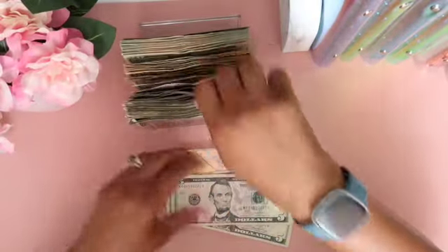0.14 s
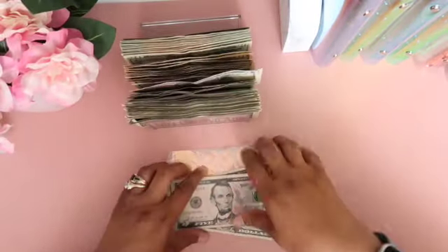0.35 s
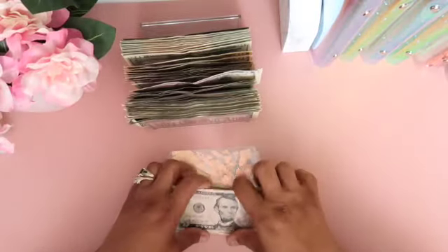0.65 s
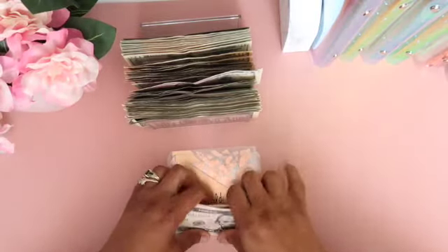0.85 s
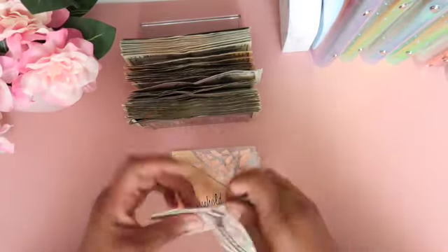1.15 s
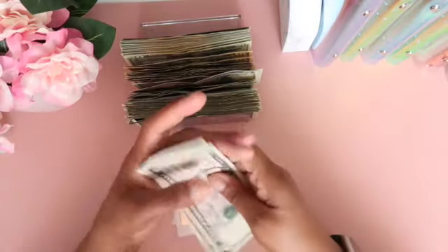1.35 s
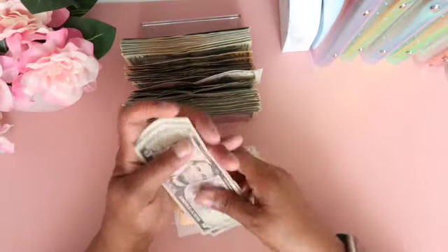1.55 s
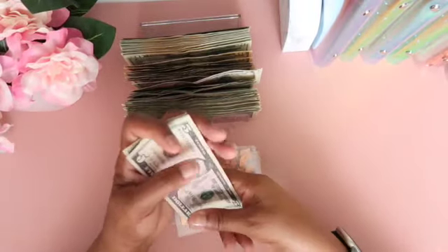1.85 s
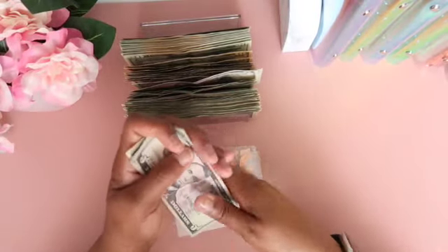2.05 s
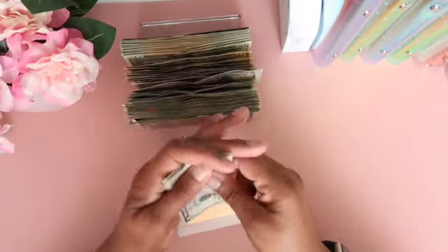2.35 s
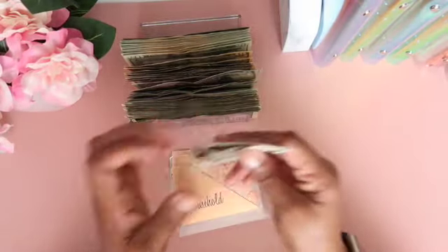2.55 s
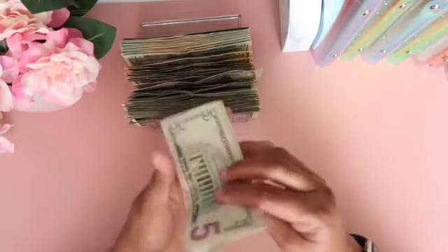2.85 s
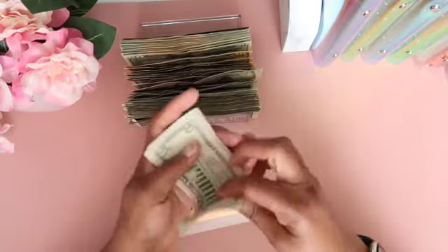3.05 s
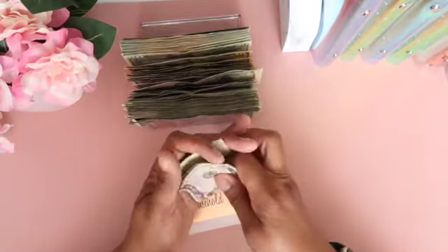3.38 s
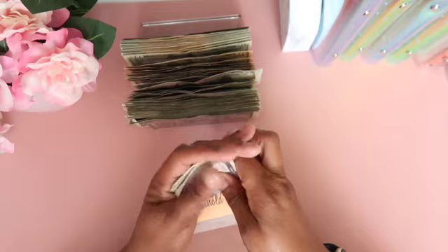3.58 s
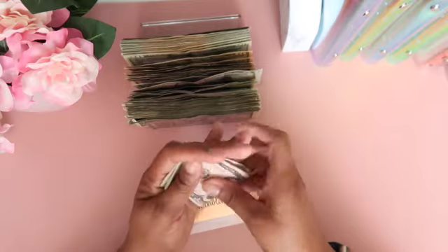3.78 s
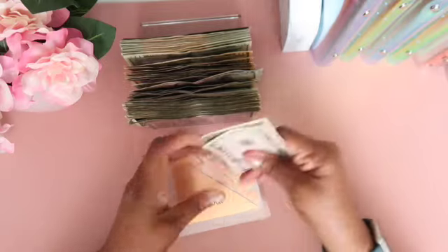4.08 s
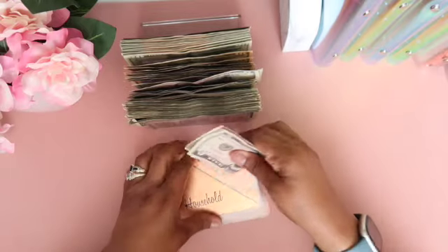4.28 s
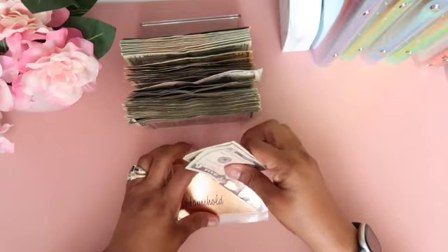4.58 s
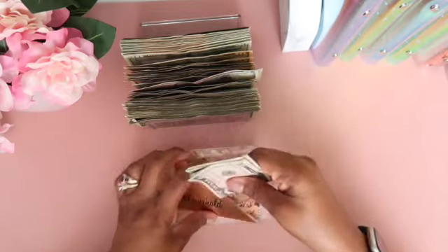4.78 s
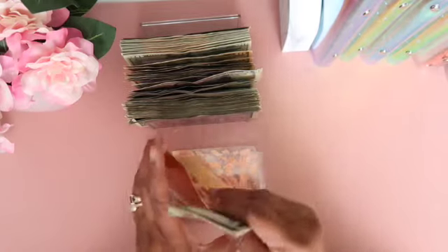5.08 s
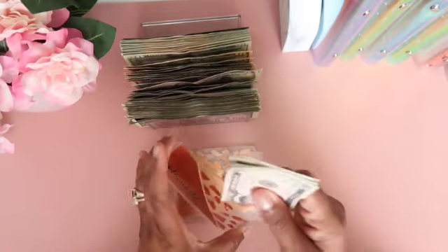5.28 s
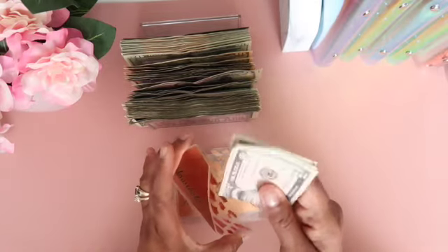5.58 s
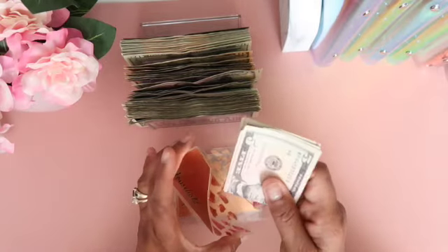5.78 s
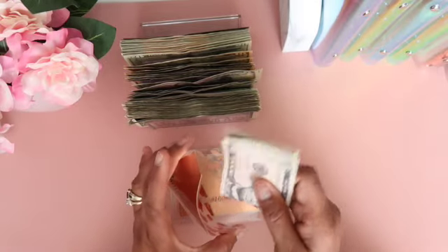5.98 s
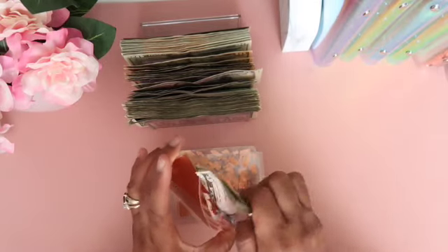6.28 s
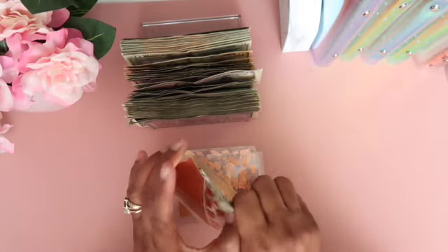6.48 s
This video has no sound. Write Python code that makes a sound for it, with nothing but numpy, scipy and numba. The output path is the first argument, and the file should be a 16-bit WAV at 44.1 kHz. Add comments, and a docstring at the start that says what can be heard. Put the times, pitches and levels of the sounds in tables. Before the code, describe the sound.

Paper bills rustle and snap in irregular bursts as hands count and tuck them into an envelope, with soft air thuds on the microphone.

```python
"""Hands count, fold and tuck banknotes into a stiff envelope on a desk, under a phone looking down.
A quiet room hums throughout. From the first moment, stirred air thuds on the two microphone ports,
paper slides with a grainy hiss as its fibres catch and slip, and creases snap, echoing off the desk.
The heaviest thuds come near 0.9 s and 2 s, a cluster of snaps near 2.9 s, then lighter handling.
From 5.9 s the stiff paper rings and cracks in its loudest flurry."""
import sys
import numpy as np
from scipy import signal
from scipy.io import wavfile
from scipy.ndimage import uniform_filter1d
from numba import njit

SR = 44100
rng = np.random.default_rng(int(sys.argv[2]) if len(sys.argv) > 2 else 0)


def transcribe(signal):
    """Save signal, clipped to [-1, 1], as a 16-bit WAV file at the path in sys.argv[1]."""
    frames = np.atleast_2d(signal).T
    limited = np.clip(frames, -1, 1)
    pcm = np.round(limited * 32767).astype(np.int16)
    wavfile.write(sys.argv[1], SR, pcm)


N = 292383
T = np.arange(N) / SR
LEFT_MINUS_RIGHT = np.array([[1], [-1]])


def undb(db):
    """Decibels to gain."""
    return 10 ** (np.asarray(db) / 20)


def level(x, db):
    """Scale to an rms level."""
    return x * undb(db) / np.sqrt(np.mean(x ** 2))


@njit
def svf(x, hz, width):
    """State-variable band-pass with a moving centre, gain 1 there."""
    y, band, low = np.empty(len(x)), 0., 0.
    for i in range(len(x)):
        g, damping = np.tan(np.pi * hz[i] / SR), width / hz[i]
        v = (band + g * (x[i] - low)) / (1 + g * (g + damping))
        band, low, y[i] = 2 * v - band, low + 2 * g * v, damping * v
    return y


def steep(x, hz, width):
    """The band-pass twice, for dark skirts."""
    hz = np.clip(hz + np.zeros(len(x)), 20, .45 * SR)
    return svf(svf(x, hz, 1. * width), hz, 1. * width)


def walk(rate):
    """Random levels held 1 / rate s and slewed twice; spread near 1."""
    hold = int(SR / rate)
    steps = np.repeat(rng.standard_normal(N // hold + 1), hold)
    return 1.3 * uniform_filter1d(uniform_filter1d(steps, hold), hold)[:N]


def grit(per_s, spread_db, smooth_db):
    """Sparse impulses of differing size over a smooth hiss."""
    size_db = spread_db * np.minimum(rng.exponential(size=N), 3)
    grains = (rng.random(N) < per_s / SR) * undb(size_db) * rng.choice([-1., 1.], N)
    return level(grains, 0) + undb(smooth_db) * rng.standard_normal(N)


def bands(x, table, drift, flicker_db, rate):
    """Resonances whose centres and strengths wander; rms 1."""
    out = 0
    for hz, width, db in table:
        gain = undb(db + flicker_db * walk(rate))
        out += gain * level(steep(x, hz * (1 + drift * walk(rate / 2)), width), 0)
    return level(out, 0)


def swells(peak_s, rise_s, fade_s, peak_db, rest_db):
    """Envelope in dB: each event climbs 30 dB in rise_s and drops 30 in fade_s, over a resting level."""
    t = np.arange(N // 32 + 2) * 32 / SR
    power = np.full(len(t), undb(2 * rest_db))
    for s, rise, fade, db in zip(peak_s, rise_s, fade_s, peak_db):
        away = np.where(t < s, (s - t) / rise, (t - s) / fade)
        power += undb(2 * (db - 30 * away))
    return np.interp(T, t, 10 * np.log10(power))


def room(tone_db=-66, hum_hz=116, hum_db=-74):
    """Half-octave bands drift, flicker and swell together, near mono in the bass; a mains hum wavers."""
    # room tone spectrum: frequency_hz, relative_density_db
    spectrum = [(18, -52), (30, -10.5), (292, -6.5), (420, -1.5), (561, -14), (656, 5.5), (874, -15),
                (1510, -16.5), (3590, -33), (4090, -33), (13300, -45.5), (15500, -55)]
    at_hz, density_db = np.transpose(spectrum)
    tone, swell = 0, walk(3.017)
    for hz in 35 * 2 ** np.arange(0, 8.8, .5):
        centre_hz = hz * (1 + .08 * walk(14))
        mid, side = (steep(rng.standard_normal(N), centre_hz, hz / 3) for _ in range(2))
        db = np.interp(np.log(hz), np.log(at_hz), density_db) + 2.2 * walk(9) + 1.6 * swell
        spread = min(0.023 + hz / 4100, 1)
        tone += undb(db) * (mid + spread * side * LEFT_MINUS_RIGHT)
    hum = undb(hum_db + 4 * walk(11)) * np.sin(2 * np.pi * hum_hz * T)
    return level(tone, tone_db) + hum


def turbulence(puff_db, lag_s):
    """Lumpy rumble that reaches the right port first; small swirls differ between the ports."""
    # rumble bands: centre_hz, width_hz, relative_db
    swirl = [(71.9, 36, -1.5), (137.3, 118, 6), (264, 220, -1), (407.4, 116, -10)]
    shared, small = (bands(grit(150, 2, -3), swirl, drift=.1, flicker_db=1.5, rate=20) for _ in range(2))
    small = undb(-9) * steep(steep(small, 230, 330), 230, 330)
    ports = np.array([np.interp(T - lag_s, T, shared) + small, shared - small])
    lean_db = 2 + 1.5 * walk(12)
    return undb(puff_db + 1.8 * walk(35) + lean_db / 2 * LEFT_MINUS_RIGHT) * ports


def eddies(lag_s):
    """Single eddies thud on the ports: each arrives quickly, then slows and fades as it spreads."""
    # eddy thuds: peak_s, level_db, pitch_hz, left_minus_right_db
    thuds = [(0.01, -35, 104, 2), (0.1, -35, 116, -14.5), (0.14, -27, 130, -9), (0.26, -31.5, 218, 18),
             (0.279, -42, 132, 4), (0.311, -36, 135, -15), (0.402, -21, 314, -0.5), (0.423, -37, 247, 16),
             (0.806, -33.5, 159, 23), (0.861, -15, 165, -1), (0.875, -13, 214, -11.5),
             (0.916, -29.5, 166, -7), (0.939, -31.5, 130, 0), (0.979, -34, 114, 1), (1.586, -34, 123, 16),
             (1.661, -26, 163, 5), (1.673, -18, 164, 11), (1.709, -22, 131, 12), (1.772, -20, 160, 5),
             (1.789, -13.5, 182, 4), (1.831, -19, 215, 14), (1.868, -37, 158, -4), (1.891, -36, 164, 15),
             (1.924, -20, 254, -8), (1.961, -18.5, 225, -2), (1.986, -25.5, 125, 10),
             (2.037, -14.5, 218, 4), (2.066, -19, 170, 1), (2.218, -35.5, 130, 11.5), (2.559, -38, 119, 8),
             (2.625, -34, 131, 7), (2.854, -31.5, 133, 5), (2.892, -37, 111, -2), (2.938, -33.5, 178, 0),
             (2.96, -27, 169, 6), (2.976, -32.5, 171, 8), (2.995, -23, 181, 4), (3.03, -30.5, 136, 3),
             (3.103, -26, 214, 12), (3.192, -34, 125, 6), (3.307, -22, 181, -4.5), (3.326, -24.5, 141, -2),
             (3.81, -34.5, 118, 5), (4.621, -32, 228, -11), (4.859, -28.5, 132, 4), (4.884, -24.5, 174, 3),
             (4.894, -25, 169, -4), (4.962, -31, 141, 4.5), (5.002, -23.5, 140, 3), (5.493, -29, 127, -4.5),
             (5.519, -35.5, 115, -3.5), (5.573, -41.5, 111, 4), (5.781, -46, 100, 2),
             (5.841, -33, 161, -12.5), (6.302, -38, 196, 7), (6.346, -36.5, 148, 15), (6.431, -29, 115, 1),
             (6.514, -18.5, 230, 2.5), (6.551, -16, 149, 5), (6.589, -32.5, 162, 3)]
    out, t = np.zeros((2, N + 2048)), np.arange(-1024, 1024) / SR
    for s, db, hz, pan_db in thuds:
        phase, jitter = rng.standard_normal(2)
        at = int(s * SR)
        cycles = hz * (t - lag_s[at] * (1 + .3 * jitter) / 2 * LEFT_MINUS_RIGHT)
        envelope = np.exp(-(cycles / np.where(cycles < 0, .45, .9)) ** 2)
        wave = envelope * np.cos(2 * np.pi * cycles * (1 - 0.32 * cycles) + 0.95 * phase)
        out[:, at:at + 2048] += undb(db + pan_db / 2 * LEFT_MINUS_RIGHT) * wave
    return out[:, 1024:N + 1024]


def air():
    """Hands push air over the ports; eddies are larger than the ports, so mostly bass comes through."""
    # puffs of air: peak_s, rise_s, fade_s, rumble_db
    puffs = [(0.0, .05, 0.13, -43), (0.147, 0.055, 0.044, -36), (0.26, 0.04, 0.084, -31),
             (.411, 0.08, 0.093, -43.5), (.804, 0.1, 0.11, -36.5), (0.864, 0.017, 0.2, -29),
             (1.585, 0.015, 0.15, -36), (1.666, 0.021, 0.41, -29), (1.781, 0.11, 0.16, -23),
             (1.846, 0.063, 0.023, -19), (1.95, 0.42, 0.24, -31.5), (2.084, 0.26, 0.035, -26.5),
             (2.215, 0.2, 0.15, -47.5), (2.554, 0.022, 0.14, -51), (2.983, 0.17, 0.1, -33.5),
             (3.099, 0.023, 0.072, -30.5), (3.205, 0.063, 0.19, -48), (3.313, 0.087, 0.085, -38),
             (3.803, 0.03, 0.12, -50.5), (4.615, 0.012, 0.13, -45), (4.879, 0.037, 0.11, -38.5),
             (5.011, 0.14, 0.065, -44.5), (5.5, 0.15, 0.077, -50), (5.836, 0.022, 0.31, -49.5),
             (6.312, 0.063, 0.33, -48.5), (6.421, 0.15, 0.085, -43.5), (6.533, 0.062, 0.17, -29.5)]
    # how far the left port trails the right as the draught turns: time_s, lag_s
    port_lag = [(0, .0006), (.3, .0012), (2.1, .0012), (2.5, .0002), (6.2, .0002), (6.5, .0009)]
    lag_s = np.interp(T, *np.transpose(port_lag))
    puff_db = swells(*np.transpose(puffs), rest_db=-87.5)
    flow = turbulence(puff_db, lag_s) + eddies(lag_s)
    flow = signal.sosfiltfilt(signal.butter(2, 42, "high", fs=SR, output="sos"), flow)
    dark, bright = (signal.sosfiltfilt(signal.butter(5, hz, fs=SR, output="sos"), flow)
                    for hz in (470, 550))
    strength = np.clip((puff_db + 36.5) / 10, 0, 1)  # strong puffs reach higher
    return dark + strength * (bright - dark)


def slide():
    """Fibres catch and slip; the same slips hiss and ring the sheets and the hollow between them."""
    # strokes of paper on paper: peak_s, rise_s, fade_s, hiss_db, top_re_hiss_db, body_db,
    # hollow_re_body_db
    strokes = [(0.045, 0.018, 0.11, -52.5, -7, -46.5, -7), (0.295, 0.0056, 0.045, -50.5, -2, -54, -5),
               (0.413, 0.033, 0.082, -57, 8.5, -54, -3.5), (0.553, 0.12, 0.12, -65, 5, -70, -19),
               (0.631, 0.045, 0.087, -59.5, 5, -77, 2), (0.694, 0.039, 0.072, -43, 3, -58.5, 3),
               (0.843, 0.038, 0.084, -51.5, 0.5, -64, 3), (0.924, 0.041, 0.062, -54, -5.5, -45.5, 0.5),
               (1.09, 0.12, 0.079, -54.5, 4, -70, 18), (1.221, 0.082, 0.059, -71, -7, -97, 7),
               (1.485, 0.066, 0.12, -47.5, -6.5, -83, 14.5), (1.545, 0.21, 0.054, -53.5, -1.5, -78, 18.5),
               (1.611, 0.032, 0.073, -50.5, -5, -78, 15.5), (1.773, 0.03, 0.25, -51, -4.5, -78, 13),
               (1.836, 0.093, 0.034, -51, -2, -82, 15), (1.933, 0.012, 0.12, -54.5, -12, -80, 16),
               (2.073, 0.026, 0.071, -45.5, -1, -57, 7), (2.54, 0.48, 0.04, -68.5, 2.5, -88, 12),
               (2.863, 0.12, 0.12, -71.5, 5.5, -69, -11.5), (2.891, 0.012, 0.11, -46.5, 1, -38.5, -7),
               (2.929, 0.063, 0.056, -39, -12, -39.5, -3), (2.96, 0.061, 0.14, -51, -7, -53, -15),
               (3.337, 0.21, 0.078, -52, 4, -59, -6.5), (3.503, 0.078, 0.086, -63, 4, -68.5, -13),
               (3.556, 0.01, 0.14, -71, 0, -57, -10), (3.792, 0.14, 0.061, -61, 6, -54, -8.5),
               (3.921, 0.032, 0.11, -66, 5, -71, 5), (3.949, 0.022, 0.039, -45, -12, -61, 5),
               (4.013, 0.07, 0.11, -56, -11, -77, 1), (4.055, 0.041, 0.035, -50, 9, -63, 7),
               (4.304, 0.2, 0.084, -70.5, 0, -67, -2), (4.62, 0.07, 0.12, -78, -0.5, -71.5, -4),
               (4.738, 0.013, 0.044, -64.5, 0, -72, -3), (4.778, 0.018, 0.3, -69.5, -9, -62.5, -2),
               (5.1, 0.032, 0.12, -74.5, -2, -92, 6), (5.27, 0.018, 0.071, -52, -5, -82, 2),
               (5.52, 0.0061, 0.032, -50, 4.5, -47.5, -4.5), (5.908, 0.019, 0.11, -52.5, -6.5, -36, 1),
               (6.158, 0.011, 0.082, -68, 2, -61, -16), (6.208, 0.0066, 0.089, -45.5, -0.5, -31, -2),
               (6.22, 0.028, 0.052, -33, -14, -29, -1.5), (6.268, 0.1, 0.056, -38.5, -8, -38.5, -23),
               (6.382, 0.0054, 0.17, -41, -7, -34, -12.5), (6.428, 0.06, 0.12, -36.5, -6, -38, -31),
               (6.468, 0.014, 0.06, -42, -2, -34.5, -1), (6.5, 0.26, 0.051, -41.5, -8, -34, -32),
               (6.565, 0.047, 0.051, -57, -32, -40.5, -19)]
    # bands of the hiss, its fine top, the sheets' body and the hollow: centre_hz, width_hz, relative_db
    hiss_bands = [(3040, 860, 9.5), (3690, 1400, 5), (4250, 1450, 9.5), (5250, 1100, 9), (6400, 670, 9),
                  (7210, 1730, 7.5)]
    top_bands = [(8420, 4040, 0.5), (10260, 2400, -5.5), (11490, 3600, -3.5), (13330, 4700, -10.5)]
    body_bands = [(1551, 343, 5.5), (1753, 150, 2.4), (1991, 200, 1.3)]
    hollow_bands = [(760, 930, 7), (982, 340, -8.5)]
    *timing, hiss, top, body, hollow = np.transpose(strokes)
    hiss_db = swells(*timing, hiss, rest_db=-108.5)  # a faint rustle stays between strokes
    layers = ((hiss_bands, hiss_db),
              (top_bands, swells(*timing, hiss + top, rest_db=-96)),
              (body_bands, swells(*timing, body, rest_db=-92.5)),
              (hollow_bands, swells(*timing, body + hollow, rest_db=-91.5)))
    slips = grit(per_s=2500, spread_db=3, smooth_db=-3) * undb(2 * walk(200) + .8 * walk(45))
    rub = sum(undb(db) * bands(slips, table, drift=.04, flicker_db=2.8, rate=40) for table, db in layers)
    return rub + undb(hiss_db - 4.5) * crinkles()


def crinkles(count=2000):
    """Small patches of paper buckle and ring briefly, each at a pitch of its own; rms 1."""
    out, t = np.zeros(N + 1024), np.arange(1024) / SR
    for when, pitch, size, ring in rng.random((count, 4)):
        at, hz = int(when * N), 2900 * 4 ** pitch
        t60 = 0.004 + 260 * ring / hz  # thin high patches die sooner
        out[at:at + 1024] += undb(9 * size ** 2 - 60 * t / t60) * np.sin(2 * np.pi * hz * t)
    return level(out[:N], 0)


def snaps():
    """Each crease gives a short rough ring at the sheet's pitch and a crack that the desk top doubles."""
    # creases and edges snapping: start_s, ring_peak_db, pitch_hz, crack_re_ring_db, t60_s
    creases = [(0.0412, -39.5, 1580, -36, 0.037), (0.043, -38.5, 2600, -14.5, 0.09),
               (0.295, -40, 5700, -17, 0.022), (0.405, -47.5, 4300, 12.5, 0.07),
               (0.5177, -51, 5500, 7, 0.072), (0.6664, -46, 6260, 14, 0.031),
               (0.6832, -36.5, 3560, 0.5, 0.12), (0.9127, -31, 1490, -15, 0.014),
               (0.915, -33.5, 3230, -27, 0.055), (0.9266, -28.5, 1095, -43, 0.11),
               (1.0642, -40.5, 2150, 7.5, 0.066), (1.0831, -37.5, 4780, 3.5, 0.038),
               (1.483, -36.5, 4940, -19, 0.02), (1.604, -33, 4560, -0.5, 0.014),
               (1.6138, -38.5, 3620, -5, 0.1), (1.93, -44, 4600, -2.5, 0.07),
               (2.0414, -42, 2360, -26, 0.085), (2.043, -45, 1020, -24, 0.12),
               (2.5381, -44, 910, -7.5, 0.11), (2.86, -50.5, 2630, -24, 0.025),
               (2.888, -32, 1820, -23, 0.039), (2.8878, -29.5, 2800, -17, 0.089),
               (2.9228, -28, 3060, -8, 0.079), (3.158, -54, 5180, -18, 0.088),
               (3.253, -49, 2400, -22, 0.13), (3.325, -41, 1790, 4, 0.064),
               (3.552, -32.5, 1760, -37, 0.009), (3.583, -44, 4030, -32, 0.03),
               (3.5846, -42.5, 1740, -42, 0.08), (3.762, -45, 1730, -25, 0.056),
               (3.79, -45, 4060, -20, 0.074), (3.917, -46, 6700, 4, 0.057),
               (3.949, -37.5, 2040, -16, 0.085), (3.949, -43, 1020, -24, 0.13),
               (4.0094, -46.5, 6300, 0, 0.069), (4.054, -42, 7540, -2, 0.025),
               (4.3014, -51, 6540, -5.5, 0.028), (4.737, -52, 2210, -17.5, 0.03),
               (4.775, -41, 4200, -22, 0.079), (4.785, -41.5, 2100, -28, 0.086),
               (4.7897, -45, 1025, -26, 0.044), (4.8111, -42.5, 1076, -20, 0.095),
               (5.268, -42, 4300, 4, 0.047), (5.52, -53, 4100, 6.5, 0.023), (5.521, -42, 1450, -19, 0.1),
               (5.528, -40, 2255, -35, 0.12), (5.903, -30.5, 1750, -20, 0.12), (5.905, -25, 702, -44, 0.12),
               (6.1573, -31.5, 1790, -31, 0.033), (6.159, -52, 4600, -15, 0.4),
               (6.2092, -25.5, 1490, -19, 0.039), (6.2148, -17.5, 1720, -33, 0.019),
               (6.269, -46, 1700, -1, 0.021), (6.295, -37, 1760, -24, 0.03),
               (6.356, -34.5, 1740, 4.5, 0.0076), (6.375, -20.5, 1634, -19, 0.021),
               (6.3755, -28.5, 4000, -12, 0.018), (6.4661, -23.5, 1650, 2, 0.044),
               (6.558, -35.5, 1570, -31, 0.061)]
    out, t = np.zeros(N + 4096), np.arange(4096) / SR
    noise, heights = rng.standard_normal((len(creases), 2, 4096)), rng.random(len(creases))
    for (s, db, hz, crack_db, t60), (tear, fizz), height in zip(creases, noise, heights):
        attack = 1 - np.exp(-t / (0.00015 + 0.081 * t60 ** 2))
        envelope = attack * undb(-60 * t / t60)
        release = 20 * undb(-130 * t60) * np.exp(-(t / .0001) ** 2)  # softer in slow creases
        blow = release + envelope * tear  # fibres tear on after the release
        width_hz = 340 + 0.14 * hz
        tone, overtone = (steep(steep(blow, f, width_hz), f, width_hz) for f in (hz, 2.284 * hz))
        flanks = steep(blow, 1.26 * hz, 1.43 * hz)
        ring = tone + undb(-16) * overtone + undb(-20.5) * flanks
        crack = steep(fizz * envelope, 6600, 14000)
        bounce_s = .0004 + 0.000301 * height
        crack += 0.74 * np.interp(t - bounce_s, t, crack, left=0)
        snap = ring / np.abs(ring).max() + undb(crack_db) * crack / np.abs(crack).max()
        at = int(s * SR)
        out[at:at + 4096] += undb(db) * snap
    return out[:N]


def desk(paper, tail_t60_s=0.15, tail_db=-20.5):
    """Echoes of desk and hands: a short tail, and treble that differs between the ports as hands move."""
    t = np.arange(8192) / SR
    echoes = level(rng.standard_normal(8192) * undb(-60 * t / tail_t60_s), tail_db) / 8192 ** .5
    tail = signal.fftconvolve(paper, echoes)[:N]
    paths = rng.standard_normal((3, 256)) * undb(-60 * t[:256] / 0.026)
    scatter = sum(walk(60) * signal.fftconvolve(paper, level(path, 0) / 16)[:N] for path in paths)
    side = undb(-5) * steep(scatter, 10500, 17000)
    return paper + tail + side * LEFT_MINUS_RIGHT


def scene():
    """Paper over the desk, air on the ports, the room."""
    return desk(slide() + snaps()) + air() + room()


def record(dry, rolloff_hz=13800, cut_hz=15600):
    """The microphones fall off in the top octave and the phone cuts steeply above that."""
    dull = signal.sosfilt(signal.butter(3, rolloff_hz, fs=SR, output="sos"), dry)
    return signal.sosfilt(signal.ellip(10, .2, 80, cut_hz, fs=SR, output="sos"), dull)


dry = scene()
out = record(dry)
transcribe(out)
```